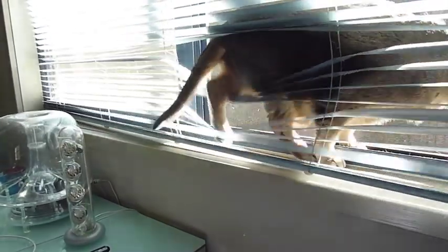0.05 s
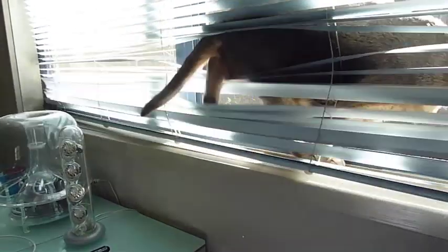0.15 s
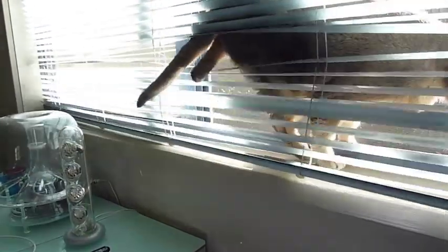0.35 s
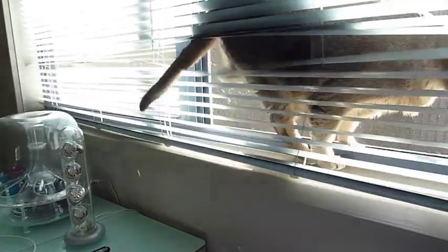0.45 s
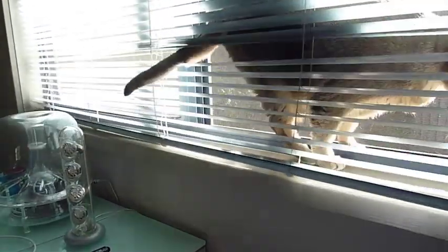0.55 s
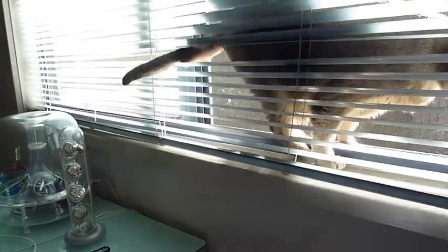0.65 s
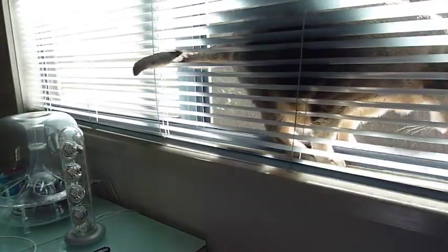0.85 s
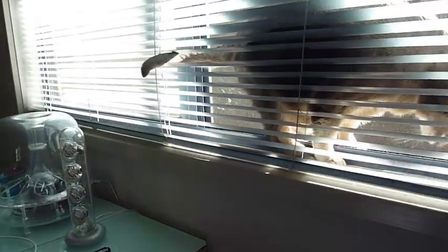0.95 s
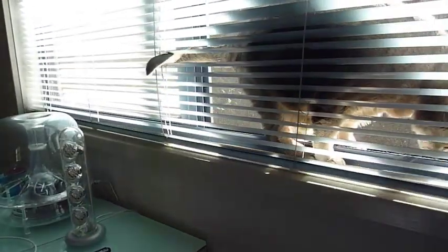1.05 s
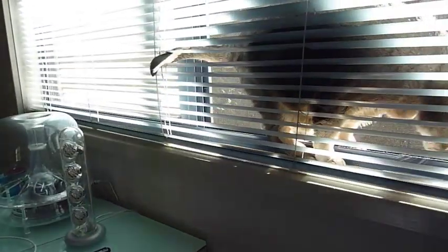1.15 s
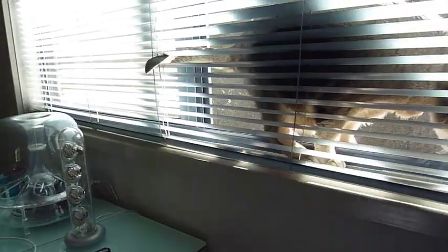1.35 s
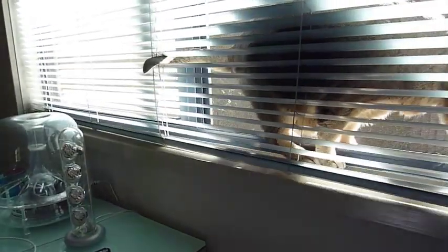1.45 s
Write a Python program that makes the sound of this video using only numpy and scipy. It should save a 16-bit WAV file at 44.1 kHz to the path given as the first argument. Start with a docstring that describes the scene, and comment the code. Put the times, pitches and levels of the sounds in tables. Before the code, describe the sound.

Metal blind slats rattle close by in a small room as a cat pushes through. They tick and rustle from the start, clash at about 0.25 seconds, and clatter loudest around 0.5 seconds with a light metallic ring. The bottom rail knocks dully against the window, mostly between 0.6 and 0.9 seconds. The blind then settles into quiet room noise, with faint ticks near 1.1 and 1.4 seconds.

```python
"""A small room, a close pair of microphones, a cat pushing through a metal venetian blind.
Bent slats tick, slip off its back and clash in flurries of tiny impacts that set them ringing;
between clashes they rustle over each other, and the cat's body rubs along them. The bottom rail
knocks dully at the window as the blind swings. Quiet room noise and a faint hum lie underneath."""
import sys
import numpy as np
from scipy import signal
from scipy.fft import rfft, irfft
from scipy.io import wavfile

SR = 44100
rng = np.random.default_rng(int(sys.argv[2]) if len(sys.argv) > 2 else 0)


def generate_wav(sig):
    """Save sig (samples, or channels by samples) to the path in sys.argv[1] as 16-bit PCM at SR."""
    pcm = np.round(np.clip(np.atleast_2d(sig).T, -1, 1) * 32767).astype(np.int16)
    wavfile.write(sys.argv[1], SR, pcm)


N = 66150

# spectrum of the room tone: f/Hz, level/dB
ROOM_TONE_COLOUR = [(20, -3), (40, -3.5), (70, -7.5), (110, -11), (165, -4), (300, 1.5), (500, -6),
                    (900, -0.5), (1500, -11.5), (2500, -24), (5000, -24.5), (9000, -29.5)]
# swell of the hum: t/s, level/dB
HUM_LEVELS = [(0, -77.5), (1.18, -72.5), (1.27, -60.5), (1.5, -76.5)]
# the cat's body against the blind: t/s, level/dB
RUB_LEVELS = [(0, -59), (.12, -61), (.5, -61), (.65, -70), (1, -69), (1.5, -67)]
# rail on window: t/s, level/dB, note f/Hz, note against knock/dB, fade/s, tilt/(dB per octave)
RAIL_KNOCKS = [(0.057, -44.5, 770, -5, 0.042, 1), (0.2302, -35, 810, 10.5, 0.006, 5.5),
               (0.258, -34.5, 1011, -4.5, 0.019, 5), (0.265, -31, 785, -8.5, 0.014, 8),
               (0.536, -36.5, 1100, 13, 0.0021, 4.5), (0.6431, -30, 1021, -2, 0.0073, 0),
               (0.66, -43.5, 497, -8.5, 0.073, -1.5), (0.71, -34, 620, -22, 0.022, 1.5),
               (0.745, -38.5, 518.6, 1.5, 0.0096, 2.5), (0.815, -40, 1016, -7, 0.043, 1),
               (0.849, -38.5, 1215, -6.5, .02, 0.5), (0.855, -32.5, 780, -2.5, 0.025, -0.5),
               (0.875, -32.5, 728, 3, 0.017, 0), (0.914, -42.5, 717, 9, 0.012, -2),
               (1.392, -40.5, 400, -13, 0.029, -2)]
# the rail's dull body: f/Hz, level/dB
RAIL_BODY = [(80, -25), (220, -18), (380, -3.5), (750, 0.5), (1200, -5.5), (1450, -13.5), (1900, -8),
             (2400, -15.5), (5000, -23), (9000, -37)]
# bent slats flicking: t/s, level/dB, f/Hz, rise and fade/s
SLAT_TICKS = [(0.046, -34.5, 3250, 0.0017), (0.0546, -30, 3350, 0.0013), (0.101, -26.5, 4150, 0.00055),
              (0.101, -32, 7100, 0.0008), (0.1039, -24.5, 4020, 0.00078), (0.1322, -23, 3425, 0.00051),
              (0.137, -34.5, 1572, 0.0015), (0.2544, -21, 1496, 0.0016), (0.2687, -22, 1493, 0.0008),
              (0.516, -15.5, 4480, 0.0014), (0.5208, -16.5, 6350, 0.00068), (0.539, -19, 1614, 0.0025),
              (0.5404, -15, 6500, 0.00045), (1.116, -47.5, 1484, 0.0021)]
# a struck slat ringing on one note: t/s, level/dB, f/Hz
SLAT_PINGS = [(0.2543, -29.5, 1548), (0.303, -32.5, 1578), (0.359, -33.5, 1600), (0.417, -32.5, 1590),
              (0.456, -30.5, 1604), (0.501, -30.5, 1600), (0.53, -31, 1612), (0.589, -36.5, 1595),
              (0.663, -54, 3996), (0.7, -38.5, 1612), (0.864, -43, 1612), (0.935, -46, 1604),
              (1.118, -60, 1570), (1.394, -52.5, 1602), (1.393, -63.5, 3220)]
# slats sliding over fur and each other: t/s, level/dB
RUSTLE_LEVELS = [(0, -58.5), (.02, -46.5), (.08, -48.5), (.15, -44.5), (.215, -42.5), (.29, -41),
                 (.37, -34.5), (.405, -41.5), (.445, -34), (.47, -34), (.492, -40), (.53, -40.5), (.6, -41),
                 (.64, -42), (.7, -41.5), (.79, -56), (.9, -53.5), (1, -70), (1.2, -67.5), (1.5, -79)]
# slats clashing: t/s, level/dB, rise/s, fade/s, tilt/(dB per octave)
SLAT_CLASHES = [(0.2253, -27, 0.00078, 0.019, -2.5), (0.2545, -25.5, 0.0005, 0.013, -0.5),
                (0.2632, -31, 0.0006, 0.0031, 3), (0.2741, -27, 0.00075, 0.033, -1),
                (0.296, -29, 0.00087, 0.0072, -2.5), (0.41, -35, 0.0024, 0.037, 1),
                (0.4975, -19, 0.0073, 0.033, 4.5), (0.5133, -22, 0.0025, 0.019, 5.5),
                (0.5373, -18, 0.002, 0.012, 4), (0.555, -29, 0.00077, 0.043, 2.5),
                (0.653, -23, 0.0066, 0.015, 0.5), (0.848, -38, 0.016, 0.021, -17),
                (1.014, -53.5, 0.00082, 0.037, -3), (1.056, -47.5, 0.0011, 0.0055, 6),
                (1.1178, -48.5, .0005, 0.023, 3)]
# slat edges scraping: t/s, level/dB, f/Hz, rise and fade/s
EDGE_SCRAPES = [(0.036, -29.5, 2780, 0.01), (0.044, -34.5, 1820, 0.019), (0.164, -43.5, 3350, 0.011),
                (0.503, -18, 3100, 0.0086), (1.12, -36, 4450, 0.0045)]
# spectrum of one contact of slat on slat: f/Hz, level/dB
CONTACT_COLOUR = [(100, -21), (350, -9), (900, -2.5), (1500, 0.5), (2200, -2), (3200, -0.5), (4500, 2),
                  (5600, 2), (7200, -3.5), (9000, -11)]
# higher modes of the slats: f/Hz, relative level/dB, T60/s
HIGH_MODES = [(2962, -5, 0.15), (3395, -8, 0.18), (4070, -7.5, 0.12), (4375, -19.5, 0.084),
              (4444, -7, 0.17), (4550, -1.5, 0.091), (4845, -8, 0.15), (5156, -10.5, 0.09), (5722, -5, .16),
              (6380, -4.5, 0.19), (6850, -5.5, 0.16), (7180, -4, 0.15)]
# stereo width at the microphones: f/Hz, side gain/dB
MIC_WIDTH = [(30, -15), (120, -10), (300, -18.5), (600, -23.5), (1000, -20), (2000, -10), (4000, -7),
             (7000, -1)]

TOP_HZ = 8750  # the recorder's upper limit


def undb(db):
    """Decibels to gain."""
    return 10 ** (np.asarray(db) / 20)


def unit(x):
    """Scale to rms 1."""
    return x / np.sqrt(np.mean(x ** 2) + 1e-18)


def clock():
    """Time of every sample."""
    return np.arange(N) / SR


def curve(rows):
    """Gain over time from rows of t/s, level/dB."""
    return undb(np.interp(clock(), *np.array(rows).T))


def burst(start, rise, fade):
    """Quick rise and exponential fade."""
    age = np.maximum(clock() - start, 0)
    return (1 - np.exp(-age / rise)) * np.exp(-age / fade)


def tone(hz):
    """A sine of random phase."""
    return np.sin(2 * np.pi * (hz * clock() + rng.random()))


def response(points, tilt_db=0, size=2 * N):
    """Gain per frequency from rows of f/Hz, level/dB, tilted per octave."""
    hz = np.maximum(np.fft.rfftfreq(size, 1 / SR), 1)
    f, db = np.array(points).T
    octaves = np.log2(np.clip(hz, 500, TOP_HZ) / TOP_HZ)
    return undb(np.interp(np.log(hz), np.log(f), db) + tilt_db * octaves)


def colour(x, points, tilt_db=0, size=2048):
    """Minimum-phase filter of the given shape; keeps the power of white noise."""
    cepstrum = irfft(np.log(unit(response(points, tilt_db, size))))
    cepstrum[1:size // 2] *= 2
    cepstrum[size // 2 + 1:] = 0
    impulse = irfft(np.exp(rfft(cepstrum)))
    return signal.oaconvolve(x, impulse[None], axes=1)[:, :N]


def resonate(x, hz, t60):
    """One decaying mode; keeps the power of white noise."""
    pole = np.exp((2j * np.pi * hz - np.log(1000) / t60) / SR)
    return signal.lfilter([np.sqrt(2 * (1 - abs(pole) ** 2))], [1, -pole], x).imag


def contacts(per_s=4500, spread_db=3):
    """Tiny impacts of uneven size, each from its own place along the blind: mid and side, rms 1."""
    hits = (rng.random(N) < per_s / SR) * rng.choice([-1, 1], N)
    hits = hits * undb(spread_db * np.clip(rng.standard_normal(N), -2, 2))
    places = rng.uniform(-0.94, 1, N)
    return np.array([unit(hits), unit(hits * places)])


def point_source(x):
    """Mid and side of a sound from one place."""
    return np.array([x, np.zeros(N)])


def microphones(mid, side, left_lag_s=3e-5):
    """A close pair: alike in the bass, apart in the treble; the right hears the window first."""
    left_right = rfft(mid, 2 * N) + np.array([[1], [-1]]) * rfft(side, 2 * N) * response(MIC_WIDTH)
    hz = np.fft.rfftfreq(2 * N, 1 / SR)
    lag = np.exp(-2j * np.pi * hz * np.array([[left_lag_s], [0]]))
    return irfft(left_right * lag)[:, :N]


def room_tail(low_t60=0.53, treble_t60=0.44, build_s=0.012):
    """Diffuse room response whose treble dies first; unit energy."""
    t, noise = clock(), rng.standard_normal(N)
    low = signal.sosfilt(signal.butter(2, 2000, fs=SR, output="sos"), noise)
    tail = low * undb(-60 * t / low_t60) + (noise - low) * undb(-60 * t / treble_t60)
    tail *= 1 - np.exp(-t / build_s)
    return tail / np.sqrt(np.sum(tail ** 2))


def in_room(pair, room_db):
    """Direct mid and side plus the room's tail, picked up as left and right."""
    mid, side = (x + undb(room_db) * signal.fftconvolve(pair[0], room_tail())[:N] for x in pair)
    return microphones(mid, side)


def room_tone(level_db=-54, waver_db=0.56):
    """The room's quiet, slightly wavering noise."""
    waver = undb(waver_db * np.interp(clock(), np.linspace(0, N / SR, 16), rng.standard_normal(16)))
    spectra = rfft(rng.standard_normal((2, 2 * N))) * response(ROOM_TONE_COLOUR)
    mid, side = (unit(irfft(spectrum)[:N]) for spectrum in spectra)
    return undb(level_db) * waver * microphones(mid, side)


def hum(hz=64):
    """A faint low hum comes and goes, alike on both microphones."""
    return np.sqrt(2) * tone(hz) * curve(HUM_LEVELS)


def body_rub(hz=162.5, width_hz=40):
    """Low rumble of the cat's body brushing along the blind."""
    t60 = np.log(1000) / np.pi / width_hz
    return unit(resonate(rng.standard_normal(N), hz, t60)) * curve(RUB_LEVELS)


def rail_knocks(rise_s=0.0008):
    """Each knock at the window chatters in the rail's dull body and brings out one note."""
    chatter, notes = 0, 0
    for start, db, hz, note_db, fade, tilt in RAIL_KNOCKS:
        blow = undb(db) * burst(start, rise_s, fade)
        chatter += colour(blow * contacts(per_s=3000, spread_db=2), RAIL_BODY, tilt)
        notes += blow * undb(note_db) * tone(hz) * np.sqrt(2)
    return in_room(chatter, room_db=-4) + in_room(point_source(notes), room_db=-15.5)


def slat_ticks(grit_db=-18):
    """Short pitched flicks of slats damped by the cat's fur."""
    ticks = 0
    for start, db, hz, length in SLAT_TICKS:
        flick = 4 * burst(start, length, length)  # peaks at 1
        ticks += undb(db) * flick * (tone(hz) + undb(grit_db) * rng.standard_normal(N))
    return ticks


def slat_pings(rise_s=0.00072, t60=0.32, beat_hz=32.22, neighbour_db=-4):
    """The note of a struck slat beats against that of its slightly lower neighbour."""
    pings = 0
    for start, db, hz in SLAT_PINGS:
        note = tone(hz)
        neighbour = undb(neighbour_db) * tone(hz - beat_hz * rng.uniform(0.85, 1.15))
        pings += undb(db) * burst(start, rise_s, t60 / np.log(1000)) * (note + neighbour)
    return pings


def slat_clatter(ring_db=-9):
    """Rustle, clashes and scrapes are swarms of contacts; they ring the slats' higher modes."""
    sliding = contacts(per_s=1600, spread_db=0) * curve(RUSTLE_LEVELS)
    clatter = colour(sliding, CONTACT_COLOUR, tilt_db=-1.3)
    for start, db, rise, fade, tilt in SLAT_CLASHES:
        clash = contacts() * undb(db) * burst(start, rise, fade)
        clatter += colour(clash, CONTACT_COLOUR, tilt)
    for start, db, hz, length in EDGE_SCRAPES:
        scrape = contacts() * undb(db) * burst(start, length, length)
        clatter += resonate(scrape, hz, t60=0.012)
    ring = sum(undb(db) * resonate(clatter, hz, t60) for hz, db, t60 in HIGH_MODES)
    return clatter + undb(ring_db) * ring / np.sqrt(len(HIGH_MODES))


def scene():
    """Cat and blind at the microphones; the rail's chatter carries the most room."""
    clatter = in_room(slat_clatter(), room_db=-10)
    pings_and_rub = in_room(point_source(slat_pings() + body_rub()), room_db=-9)
    ticks = in_room(point_source(slat_ticks()), room_db=-9.5)
    return clatter + pings_and_rub + ticks + rail_knocks() + room_tone() + hum()


def record(dry):
    """The recorder has a narrow notch in the treble, a dull top and a steep cut-off."""
    notch_hz, notch_width_hz = 5433, 550
    shelf_hz, shelf_db = 7870, -13.5
    hz = np.fft.rfftfreq(2 * N, 1 / SR)
    notch = abs(hz - notch_hz) / np.hypot(hz - notch_hz, notch_width_hz / 2)
    shelf = undb(shelf_db * (1 + np.tanh((hz - shelf_hz) / 250)) / 2)
    dulled = irfft(rfft(dry, 2 * N) * notch * shelf)[:, :N]
    return signal.sosfilt(signal.ellip(12, 0.2, 80, TOP_HZ, fs=SR, output="sos"), dulled)


dry = scene()
out = record(dry)
generate_wav(out)
```